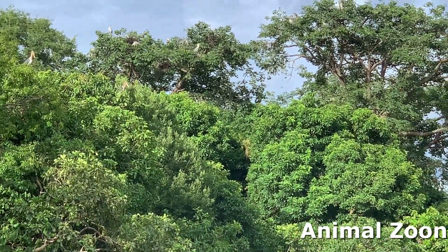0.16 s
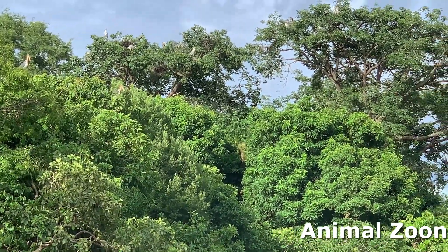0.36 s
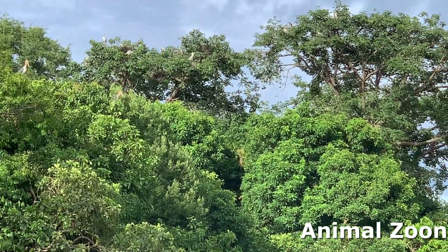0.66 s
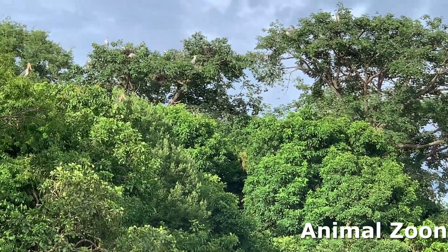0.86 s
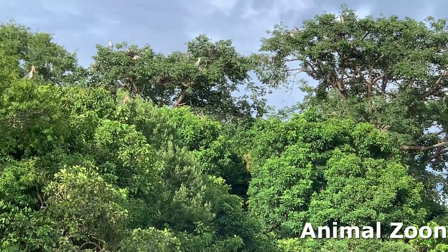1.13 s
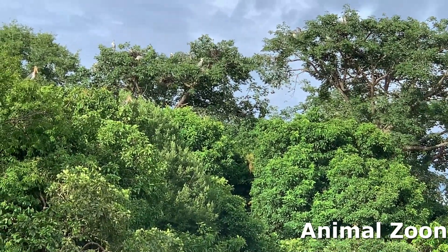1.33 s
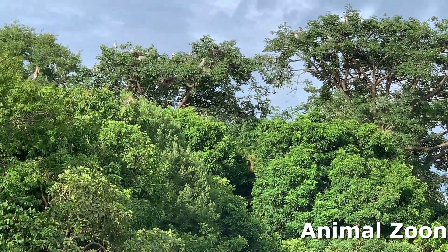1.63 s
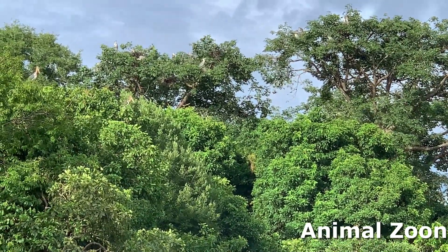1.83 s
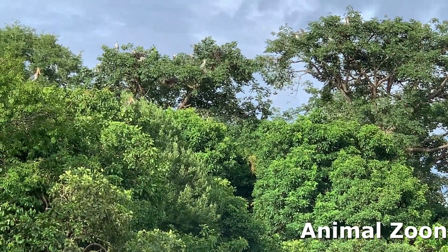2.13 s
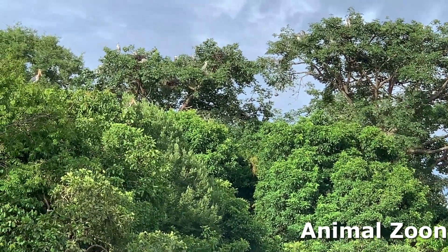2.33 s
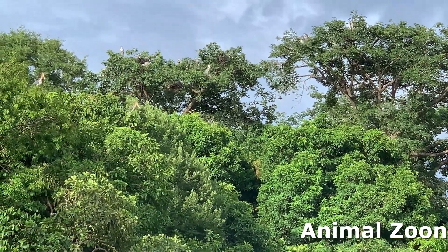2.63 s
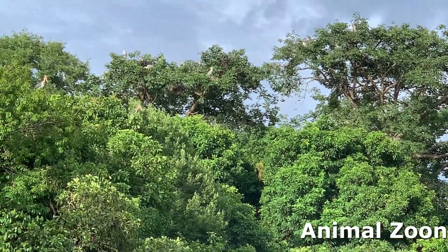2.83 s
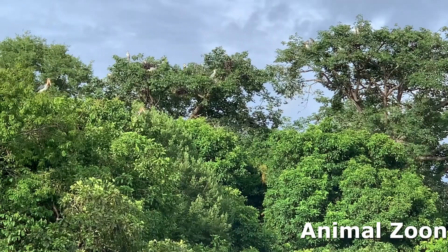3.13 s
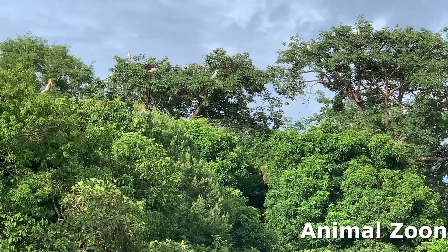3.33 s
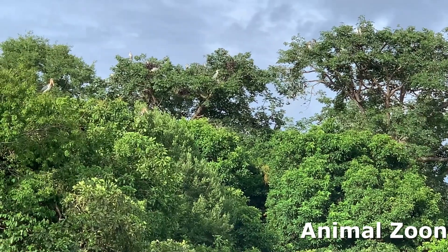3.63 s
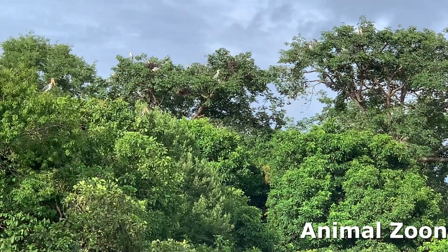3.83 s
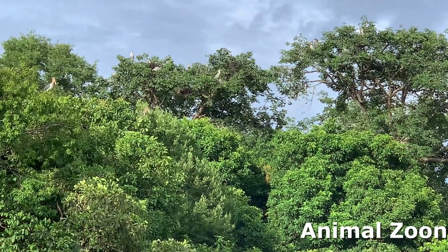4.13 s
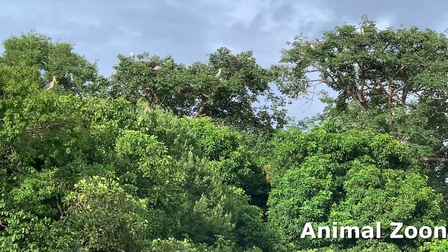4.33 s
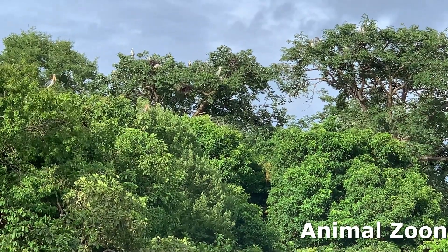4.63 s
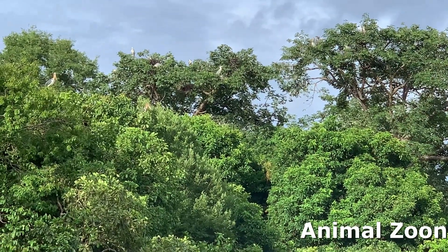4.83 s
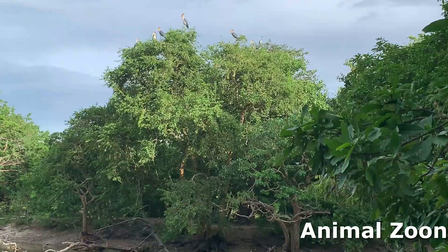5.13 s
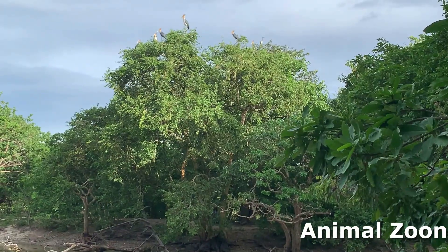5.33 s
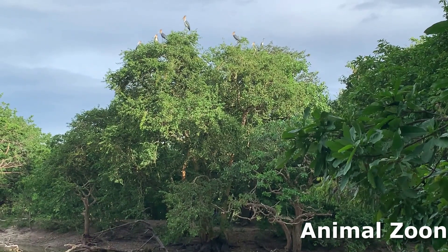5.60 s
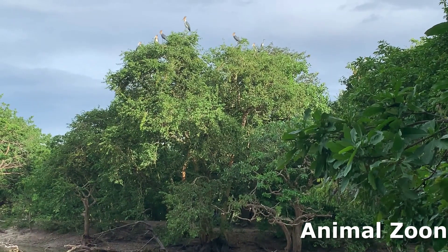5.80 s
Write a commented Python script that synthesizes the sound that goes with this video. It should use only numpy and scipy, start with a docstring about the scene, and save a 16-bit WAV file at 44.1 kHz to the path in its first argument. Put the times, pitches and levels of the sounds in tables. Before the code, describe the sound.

A near frog rattles in rapid hard clicks about once a second, over purring and ticking callers and a dense distant chorus among trees.

```python
"""In the trees of a wetland, a chorus of small animals calls, most likely frogs.
A near caller rattles about once a second: each click is a snap, a hollow low part and a throat ring.
Callers further back purr in runs of soft pips, and others tick in higher, slower trains.
Many more rattle far off, made of noise pulses, over still air. The foliage scatters the nearer calls.
Noise bursts stand for the recorder's overload on loud clicks, and its limiter holds the loudest down."""
import sys
import numpy as np
from scipy import signal
from scipy.fft import rfft, irfft, next_fast_len
from scipy.io import wavfile
from scipy.ndimage import uniform_filter1d, minimum_filter1d

SR = 44100
rng = np.random.default_rng(int(sys.argv[2]) if len(sys.argv) > 2 else 0)


def materialize(psi):
    """Save the field psi as 16-bit PCM at rate SR to the path in sys.argv[1].

    A 1-D psi becomes a single channel; in a 2-D psi each row is a channel.
    """
    bounded = np.clip(np.atleast_2d(psi).T, -1, 1)
    quanta = np.round(bounded * 32767).astype(np.int16)
    wavfile.write(sys.argv[1], SR, quanta)


N = 262836  # length in samples

# Colours of noise, as relative level at each pitch: f/Hz, level/dB per Hz
# still air among the trees
AIR_COLOUR = [(25, 7.5), (60, 7), (150, 4.5), (400, 1.5), (750, 9), (2000, 10), (9000, -18), (11000, -4),
              (12000, -12.5), (13000, -6), (15500, -18)]
# the distant chorus, middle range
CHORUS_COLOUR = [(700, -49.5), (900, -25), (1040, -19), (1150, -6.5), (1280, -2.5), (1450, -9), (2000, -4),
                 (2600, 5), (2950, 3.5), (3200, 0), (3700, 1.5), (4200, -10), (5000, -11), (7000, -43.5)]
# the distant chorus, treble; also the scattered part of the near rattle
TREBLE_COLOUR = [(4000, -32.5), (5200, 0), (6300, 7.5), (7200, -3.5), (8500, -11.5), (10000, -36)]
# a tick scattered by the leaves
RUSTLE_COLOUR = [(2500, -16.5), (3600, -5), (4400, 9), (5200, 6.5), (6200, 10), (7100, -19.5),
                 (8500, -18.5), (10000, -38.5)]
# the broadband splatter of recorder overload on the loudest rattle clicks and ticks
OVERLOAD_COLOUR = [(40, 1), (200, 1.5), (700, 4), (3000, -1), (8500, 5), (10300, 3), (11800, -2),
                   (13200, -2.5), (16000, -5.5)]

# Resonances set off by one click: f/Hz, relative level/dB, delay/s (minus is early), swell time/s
# the broad snap of a rattle click
SNAP = [(1710, -11.5, -.0005, 0.0016), (2253, 4, -.0003, 0.00051), (2620, -2.5, -0.0043, 0.00039),
        (3597, -2.5, -.0002, 0.0015), (4834, -4.5, -.0002, 0.00071)]
# the throat ringing on after it
THROAT = [(2927, 3, 0.00037, 0.0019)]
# the low, hollow part of a rattle click
HOLLOW = [(1251, -14.5, -.0013, 0.0028)]
# the short ring of a tick
TICK_BODY = [(3616, 5.5, .0002, 0.00079), (4006, -3.5, .0004, 0.00069), (2630, -10.5, -.0003, 0.0002)]
# the bright edge of a tick
TICK_EDGE = [(5750, -.5, .0001, .00058), (6750, -1, -.0001, .00042), (4800, -9, .0007, .0006),
             (8300, -23, .0001, .0006)]

# Calls; their levels are starting points that the call's shape, small chances and gains then change
# purrs of the callers further back: start t/s, pip spacing/s, pips (count), level/dB
PURRS = [(.0755, .0222, 4, -13), (.335, .023, 11, -20), (.603, .0201, 10, -16.5), (1.101, .0234, 9, -15.5),
         (1.43, .0205, 18, -16), (1.846, .0245, 5, -17), (2.112, .0228, 11, -19), (2.412, .0223, 11, -17),
         (2.668, .0246, 9, -16.5), (3.409, .0202, 7, -12), (3.549, .0202, 12, -18),
         (4.201, .021, 13, -17.5), (4.493, .0203, 13, -16), (5.13, .0216, 8, -15),
         (5.3035, .0206, 11, -15.5), (5.572, .0245, 7, -20), (5.789, .0233, 8, -14.5)]
# echoes around the purrs: early level/dB, early decay/s, tail level/dB, time for the tail to fall 60 dB/s
PURR_ECHOES = (-23.5, .015, -11, .28)
# trains of the high tickers: start t/s, tick spacing/s, hurry/s per tick squared, ticks (count),
# body level/dB, bright edge level/dB
TICK_TRAINS = [(.052, .0634, 0, 2, -12, -26), (.159, .0602, .0002, 9, -9, -20),
               (.5612, .0548, 0, 9, -10.5, -25.5), (1.1623, .057, 0, 3, -14, -29),
               (1.2662, .0601, .0002, 9, -8.5, -20), (1.5335, .0544, 0, 7, -13.5, -29.5),
               (2.3597, .0604, .0002, 9, -8, -20.5), (2.5305, .0529, 0, 10, -11.5, -26.5),
               (3.3925, .0601, .0002, 8, -9, -21), (3.4017, .0561, 0, 9, -11.5, -28),
               (4.279, .0555, 0, 8, -13.5, -29), (4.406, .0602, .0002, 9, -8.5, -21.5),
               (5.2705, .041, 0, 2, -10.5, -26), (5.3535, .054, 0, 8, -11.5, -25.5)]
# ticks that overload the recorder: t/s, splatter level/dB
TICK_OVERLOADS = [(1.678, -49), (3.851, -43), (5.5686, -43)]
# calls of the near rattler: start t/s, click spacing/s, clicks (count), snap level/dB,
# throat ring level/dB, strongest overload splatter level/dB, where in the call it peaks (0-1)
RATTLES = [(-.0467, .02451, 17, -11.5, -11.5, -43, .59), (.8021, .0244, 17, -11.5, -11.5, -41.5, .7),
           (1.7251, .0251, 17, -11, -12.5, -39, .67), (2.8531, .02447, 18, -11.5, -12, -39, .59),
           (3.8097, .02451, 17, -12, -12.5, -42, .72), (4.6396, .02454, 17, -12, -11.5, -44, .71),
           (5.7356, .02528, 17, -11.5, -12, -45, .6)]
# the swell that all rattles share: part of the call (0-1), snap level/dB, throat ring level/dB
RATTLE_SWELL = [(0, -3.5, -10), (0.199, -.3, -8), (.6, .3, -.3), (.87, -2.5, -.8), (1, -8, -3.8)]

# the distant chorus dips around a moment after each near call starts
FAR_RATTLES_DB, FAR_TICKS_DB = -23.8, -44.3
HUSH_DB, HUSH_TREBLE_DB, HUSH_AFTER_S, HUSH_WIDTH_S = -2.4, -1.2, .35, .19
# level change at both ends of a call
PURR_ENDS_DB, TICK_ENDS_DB, EDGE_ENDS_DB = -3, -6.5, -1
# every rattle starts hurried, settles, then slowly gathers speed; the last is in s per click squared
RATTLE_RUSH_S, RATTLE_SETTLE_CLICKS, RATTLE_HURRY_S = .0128, 1.43, .00011
# overload splatter: fall at one width from its peak, width as part of the call, floor, random spread
OVERLOAD_FALL_DB, OVERLOAD_WIDTH, OVERLOAD_FLOOR_DB, OVERLOAD_SPREAD_DB = 5, .155, -65, 1.5
# random spread of timing and level from one near click or tick to the next
SLIP_S, UNEVEN_DB = .0002, .6


def from_db(db):
    """Turns decibels into a factor on the wave."""
    return 10 ** (np.asarray(db) / 20)


def rms_one(x):
    """Scales a sound to an average strength (rms) of 1."""
    return x / np.sqrt(np.mean(x ** 2) + 1e-20)


def coloured(x, spectrum):
    """Filters x by a curve of (Hz, dB) points, then scales it to rms 1."""
    hz, db = np.transpose(spectrum)
    size = next_fast_len(N + 4096)
    bins = np.maximum(np.fft.rfftfreq(size, 1 / SR), 1)
    gain_db = np.interp(np.log(bins), np.log(hz), db, left=-80, right=-80)
    return rms_one(irfft(rfft(x, size) * from_db(gain_db), size)[:N])


def add_resonance(out, start, hz, db, swell):
    """One resonance swells for a few cycles and dies away."""
    swell = max(swell, 1e-4)
    first = max(int(start * SR) + 1, 0)
    last = min(int((start + 10 * swell) * SR), N)
    at = np.arange(first, last)
    age = at / SR - start
    envelope = (age / swell * np.exp(1 - age / swell)) ** 2
    out[at] += from_db(db) * envelope * np.sin(2 * np.pi * hz * age)


def clicks(times, levels_db, resonances, pitch_spread, spread_db, tuning=1):
    """Every click sets off all resonances, each a little differently; tuning shifts them together."""
    out = np.zeros(N)
    tunings = tuning * np.ones(len(times))
    chances = rng.standard_normal((len(times), len(resonances), 2))
    for time, level_db, shift, chance in zip(times, levels_db, tunings, chances):
        for (hz, db, delay, swell), (detune, push) in zip(resonances, chance):
            pitch = hz * shift * (1 + pitch_spread * detune)
            add_resonance(out, time + delay, pitch, level_db + db + spread_db * push, swell)
    return out


def bursts(times, levels_db, spectrum, gain_db, swell_s, delay_s):
    """A short swell of coloured noise at each time."""
    strikes = np.zeros(N)
    at = ((times + delay_s) * SR).astype(int)
    inside = (at >= 0) & (at < N)
    strikes[at[inside]] = from_db(levels_db + gain_db)[inside]
    age = np.arange(SR // 10) / SR / swell_s
    envelope = signal.oaconvolve(strikes, (age * np.exp(1 - age)) ** 2)[:N]
    return envelope * coloured(rng.standard_normal(N), spectrum)


def foliage(x, early_db, early_s, tail_db, t60):
    """Dense quick echoes off trunks and ground, then a diffuse tail from the leaves."""
    age = np.arange(SR) / SR
    trunks = rng.standard_normal(SR) * (age > .003) * np.exp(-age / early_s)
    leaves = rng.standard_normal(SR) * (1 - np.exp(-age / .0062)) * from_db(-60 * age / t60)
    echoes = from_db(early_db) * rms_one(trunks) + from_db(tail_db) * rms_one(leaves)
    return x + signal.fftconvolve(x, echoes / np.sqrt(SR))[:N]


def radiated(x):
    """Such small bodies radiate almost nothing below a kilohertz."""
    return signal.sosfilt(signal.butter(6, 1000, "high", fs=SR, output="sos"), x)


def pulse_times(start, spacing, pulses, hurry=0):
    """Pulse times of one call, and how far through the call each one is (0-1)."""
    k = np.arange(round(pulses))
    return start + spacing * k - hurry * k ** 2, k / k[-1]


def ends(part):
    """0 in the middle of a call, rising to 1 at its first and last pulse."""
    return np.abs(2 * part - 1) ** 3


def still_air():
    """The steady, faint noise of still air among the trees."""
    return from_db(-55) * coloured(rng.standard_normal(N), AIR_COLOUR)


def far_calls(per_s, swell_s, blur_db, count=12):
    """Many callers pulse in bouts, each at its own pace and timbre; levelling makes an even wash."""
    t, out = np.arange(N) / SR, np.zeros(N)
    age = t[:SR // 50] / swell_s
    for pace, start, bout_rate in rng.uniform(-1, 1, (count, 3)):
        # 0.75 to 1.25 bouts a second, with slightly quicker pulses at the height of each
        bout = .5 + .5 * np.sin(2 * np.pi * (1 + .25 * bout_rate) * t + np.pi * start)
        rate = per_s * (1 + .1 * pace) * (.83 + .2 * bout)
        turns = np.cumsum(rate) / SR + start
        strikes = np.diff(np.floor(turns), prepend=np.floor(turns[0])) * bout
        pulse = rms_one(rng.standard_normal(len(age)) * age * np.exp(-age))
        out += signal.oaconvolve(strikes, pulse)[:N]
    even = out / np.sqrt(uniform_filter1d(out ** 2, size=6000) + 1e-12)
    # plain noise blurs the single pulses
    return even + from_db(blur_db) * rng.standard_normal(N)


def distant_chorus():
    """Far rattlers fill the middle range, far tickers the treble; both give way to the near caller."""
    t = np.arange(N) / SR
    hush = sum(np.exp(-((t - start - HUSH_AFTER_S) / HUSH_WIDTH_S) ** 2) for start, *_ in RATTLES)
    rattlers = coloured(far_calls(per_s=44, swell_s=.0016, blur_db=-6), CHORUS_COLOUR)
    tickers = coloured(far_calls(per_s=24, swell_s=.001, blur_db=-2.5), TREBLE_COLOUR)
    rattlers_gain = from_db(FAR_RATTLES_DB + HUSH_DB * hush)
    tickers_gain = from_db(FAR_TICKS_DB + HUSH_TREBLE_DB * hush)
    return rattlers_gain * rattlers + tickers_gain * tickers


def purr():
    """Runs of soft, nearly pure pips, each led by a weak low resonance."""
    pitch_hz, low_hz, pitch_spread = 2790, 1220, .029
    gain_db, low_db, uneven_db = 1.5, -18, .5
    swell_s, low_lead_s, jitter_s = .001423, .00199, .000668
    out = np.zeros(N)
    for start, spacing, pips, level_db in PURRS:
        times, part = pulse_times(start, spacing, pips)
        levels_db = level_db + PURR_ENDS_DB * ends(part)
        chances = rng.standard_normal((len(times), 3))
        for time, pip_db, (slip, push, bend) in zip(times, levels_db, chances):
            onset = time - swell_s + jitter_s * slip
            pip_db = pip_db + uneven_db * push
            detune = 1 + pitch_spread * bend
            add_resonance(out, onset, pitch_hz * detune, pip_db + gain_db, swell_s)
            add_resonance(out, onset - low_lead_s, low_hz * detune, pip_db + low_db, swell_s)
    return radiated(foliage(out, *PURR_ECHOES))


def tick_clicks():
    """All ticks as columns: time, body dB, edge dB."""
    trains = []
    for start, spacing, hurry, ticks, body_db, edge_db in TICK_TRAINS:
        times, part = pulse_times(start, spacing, ticks, hurry)
        slip, push = rng.standard_normal((len(times), 2)).T
        trains.append([times + SLIP_S * slip,
                       body_db + TICK_ENDS_DB * ends(part) + UNEVEN_DB * push,
                       edge_db + EDGE_ENDS_DB * ends(part) + UNEVEN_DB * push])
    return np.hstack(trains)


def ticker():
    """About 17 ticks a second, each with a bright edge and a short, lower ring."""
    times, body_db, edge_db = tick_clicks()
    body = clicks(times, body_db, TICK_BODY, pitch_spread=.022, spread_db=.5)
    edge = clicks(times, edge_db, TICK_EDGE, pitch_spread=.035, spread_db=1.2)
    voice = foliage(radiated(body + edge), early_db=-12, early_s=.0034, tail_db=-20, t60=.22)
    # moving leaves scatter each tick in a different way
    scattered = bursts(times, edge_db, RUSTLE_COLOUR, gain_db=-10, swell_s=.005, delay_s=-.002)
    # a few ticks overload the recorder
    over_times, over_db = np.transpose(TICK_OVERLOADS)
    overload = bursts(over_times, over_db, OVERLOAD_COLOUR, gain_db=11.5, swell_s=.00073, delay_s=-.00045)
    return voice + scattered + overload


def rattle_clicks():
    """All near clicks as columns: time, time into the call, snap dB, ring dB, overload dB."""
    part_points, snap_swell, ring_swell = np.transpose(RATTLE_SWELL)
    calls = []
    for start, spacing, count, snap_db, ring_db, overload_db, peak in RATTLES:
        times, part = pulse_times(start, spacing, count, RATTLE_HURRY_S)
        slip, snap_push, ring_push, overload_push = rng.standard_normal((len(times), 4)).T
        rush = RATTLE_RUSH_S * (1 - np.exp(-np.arange(len(times)) / RATTLE_SETTLE_CLICKS))
        times = times - rush + SLIP_S * slip
        # overload splatter is strongest around one moment of a call
        fall_db = OVERLOAD_FALL_DB * ((part - peak) / OVERLOAD_WIDTH) ** 2
        overload = np.maximum(overload_db - fall_db, OVERLOAD_FLOOR_DB)
        calls.append([times, times - start,
                      snap_db + np.interp(part, part_points, snap_swell) + UNEVEN_DB * snap_push,
                      ring_db + np.interp(part, part_points, ring_swell) + UNEVEN_DB * ring_push,
                      overload + OVERLOAD_SPREAD_DB * overload_push])
    return np.hstack(calls)


def near_rattle():
    """About 45 clicks a second: a broad snap, then the throat rings; calls start hollow, end bright."""
    times, call_age, snap_db, ring_db, overload_db = rattle_clicks()
    # the throat tightens during a call, so its pitch climbs
    tuning = 1 - .13 * np.exp(-call_age / .13)
    # the weaker the ring, the stronger the hollow part
    hollow_db = snap_db - (ring_db + 15)
    snap = clicks(times, snap_db, SNAP, pitch_spread=.016, spread_db=2.2, tuning=np.sqrt(tuning))
    hollow = clicks(times, hollow_db, HOLLOW, pitch_spread=.01, spread_db=.7)
    ring = clicks(times, ring_db, THROAT, pitch_spread=.016, spread_db=.4, tuning=tuning)
    dry_voice = radiated(snap + hollow + ring)
    voice = foliage(dry_voice, early_db=-25.5, early_s=.0031, tail_db=-26, t60=.16)
    scattered = bursts(times, snap_db, TREBLE_COLOUR, gain_db=-28, swell_s=.003, delay_s=-.001)
    # the splatter of the recorder overloading
    overload = bursts(times, overload_db, OVERLOAD_COLOUR, gain_db=4, swell_s=.0017, delay_s=-.0011)
    return voice + scattered + overload


def scene():
    """All layers together, from the background to the near caller, as one channel."""
    return (still_air() + distant_chorus() + purr() + ticker() + near_rattle())[None]


def record(dry):
    """A limiter ducks just ahead of the loudest clicks and recovers quickly; the top is cut."""
    ceiling_db, release_db_per_s, cutoff_hz = -2.5, 200, 15900
    over_db = np.maximum(20 * np.log10(np.abs(dry) + 1e-9) - ceiling_db, 0)
    # ducking jumps up at once, then falls back at the release speed
    ramp = release_db_per_s * np.arange(N) / SR
    duck_db = np.maximum.accumulate(over_db + ramp, axis=-1) - ramp
    # reach a few samples ahead, then smooth
    gain_db = uniform_filter1d(minimum_filter1d(-duck_db, size=25), size=33)
    top_cut = signal.ellip(10, .1, 80, cutoff_hz, fs=SR, output="sos")
    return signal.sosfilt(top_cut, dry * from_db(gain_db))


dry = scene()
out = record(dry)
materialize(out)
```